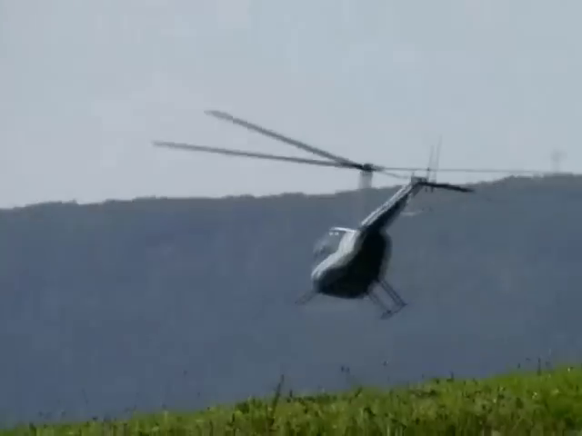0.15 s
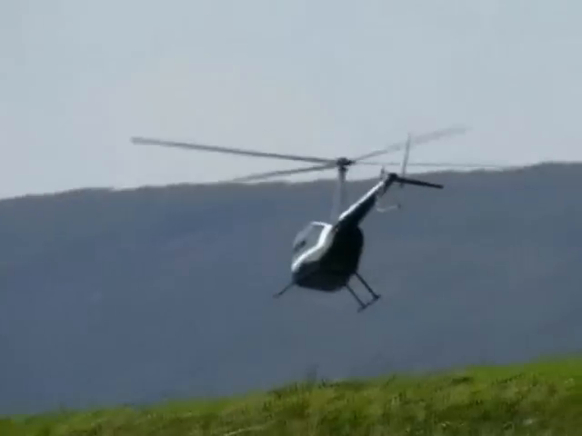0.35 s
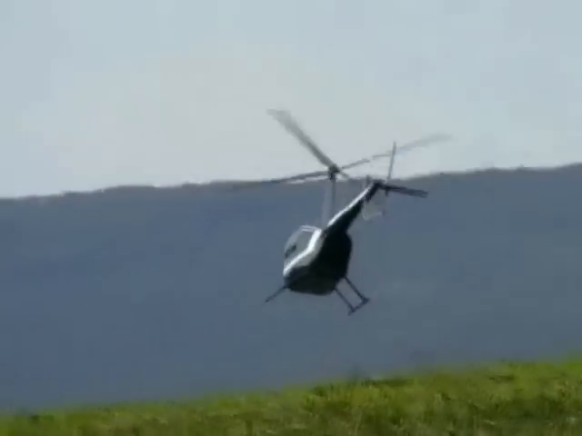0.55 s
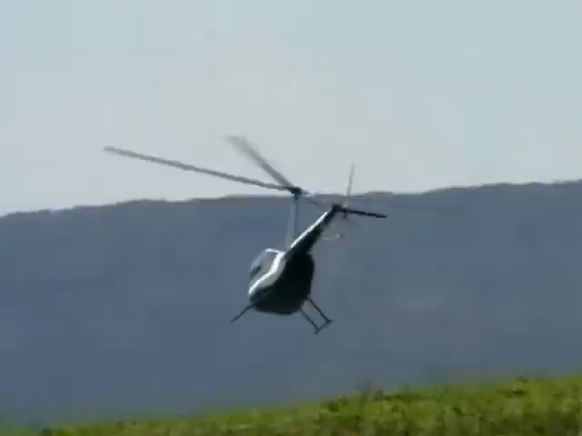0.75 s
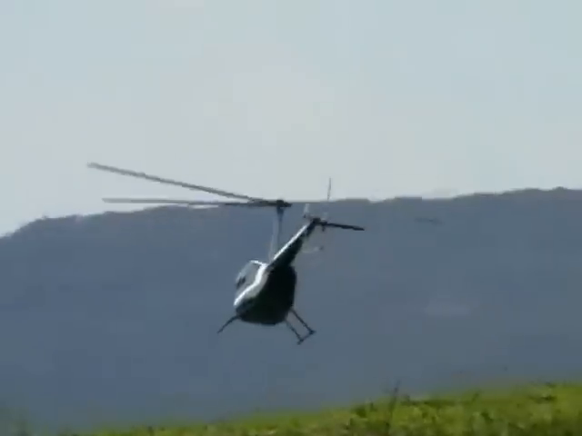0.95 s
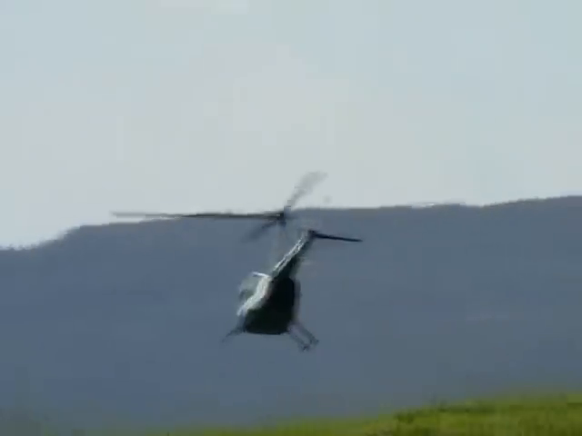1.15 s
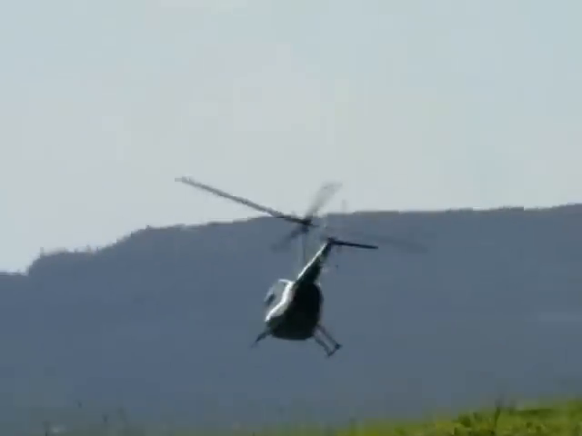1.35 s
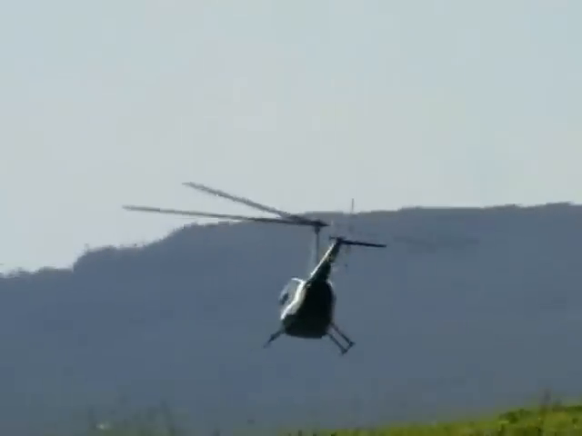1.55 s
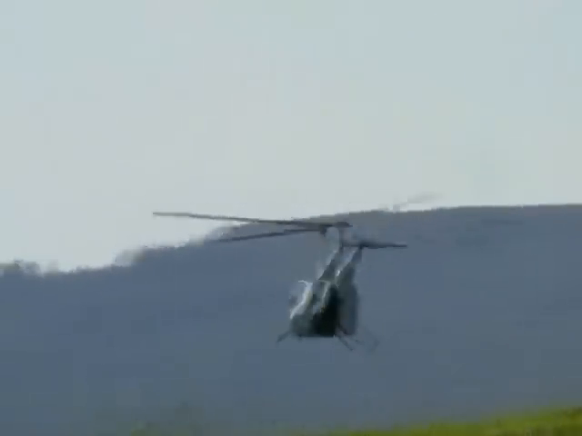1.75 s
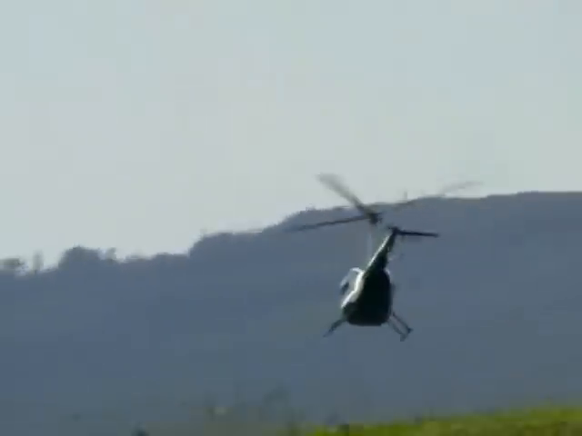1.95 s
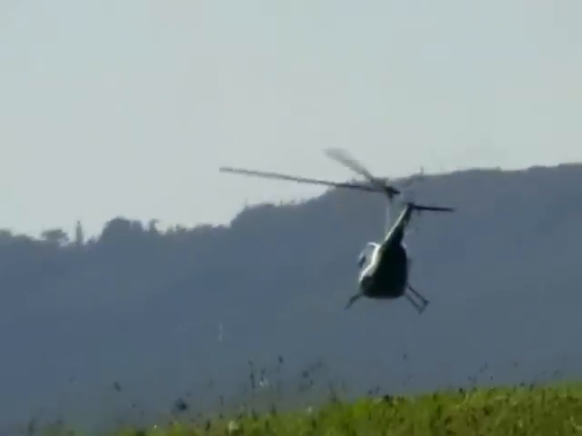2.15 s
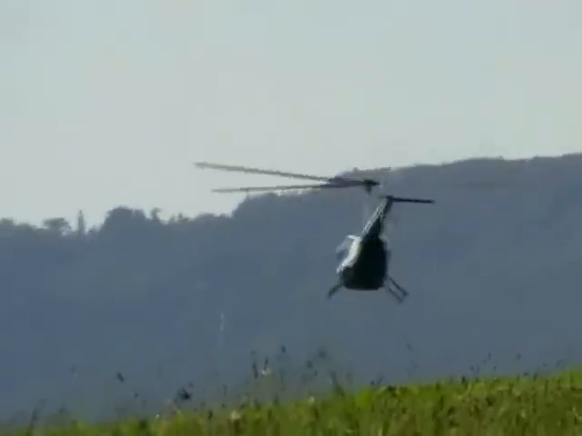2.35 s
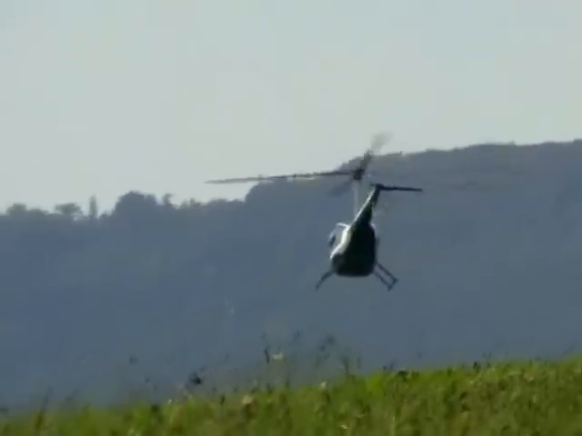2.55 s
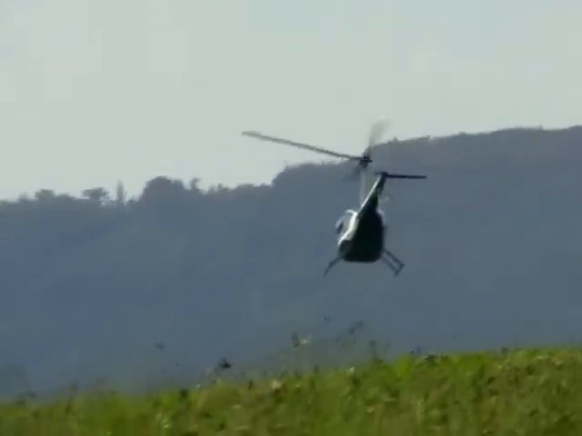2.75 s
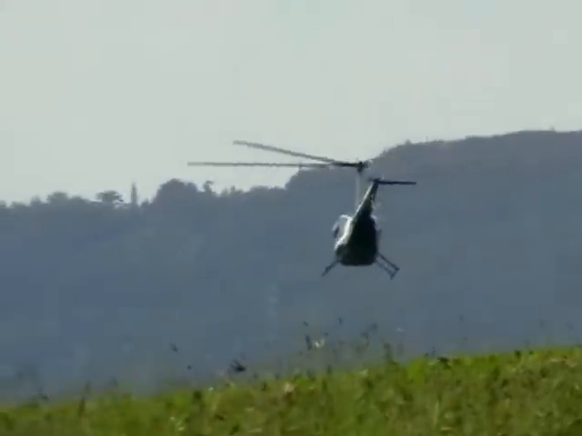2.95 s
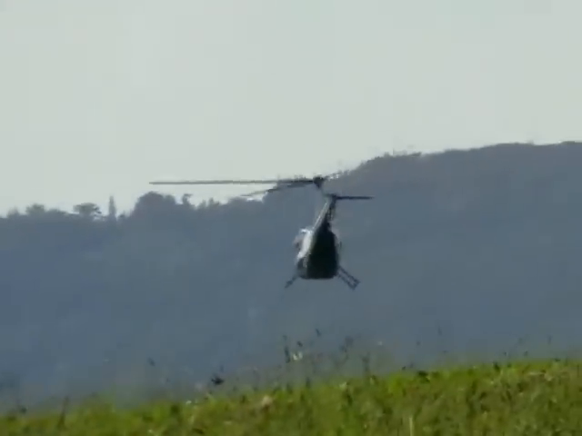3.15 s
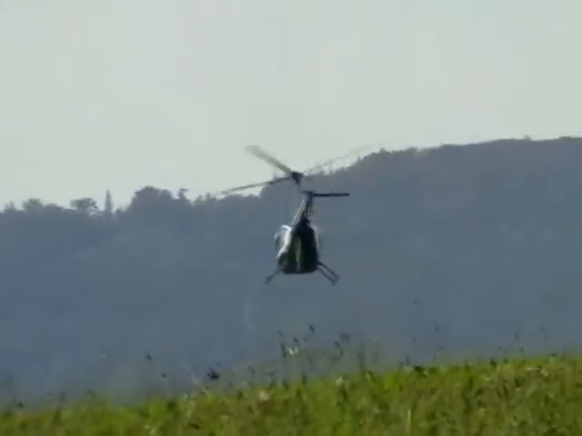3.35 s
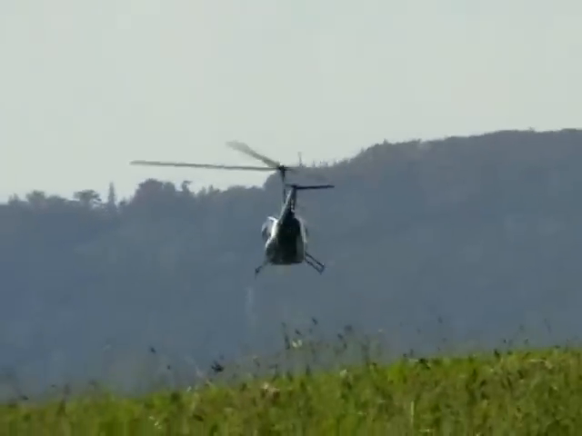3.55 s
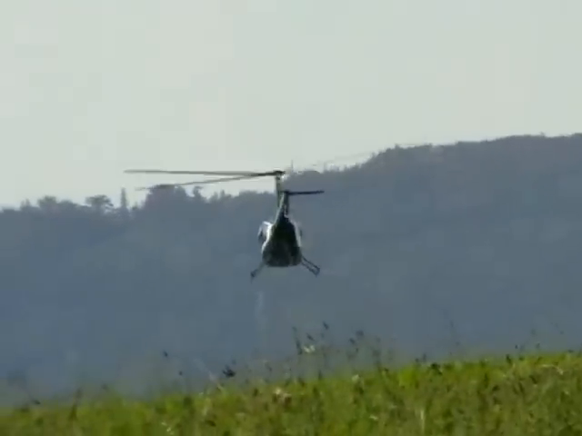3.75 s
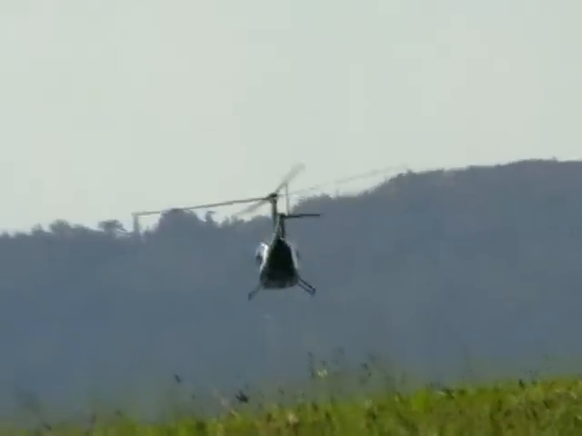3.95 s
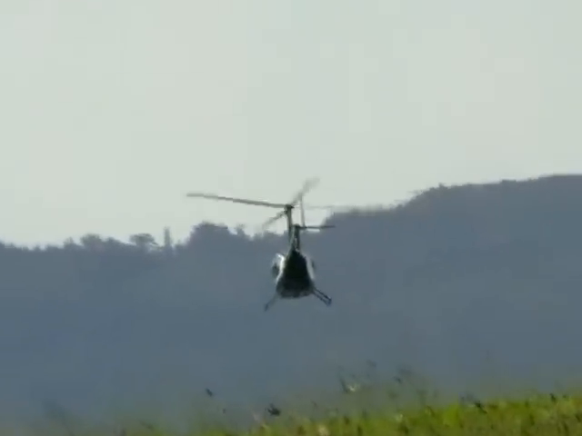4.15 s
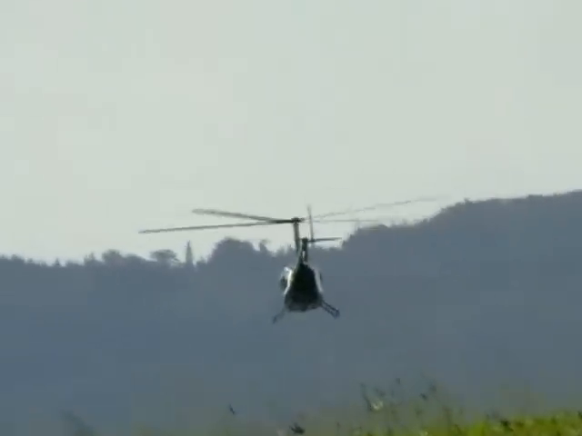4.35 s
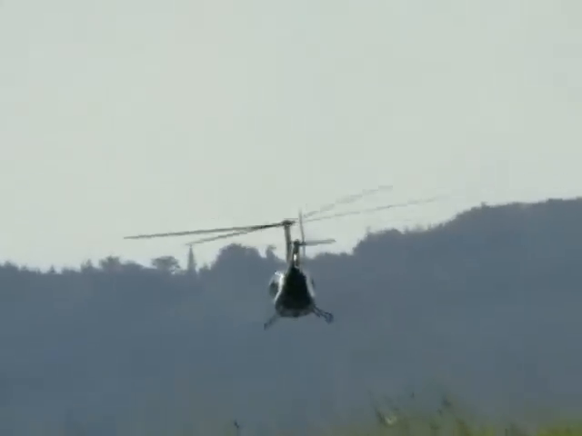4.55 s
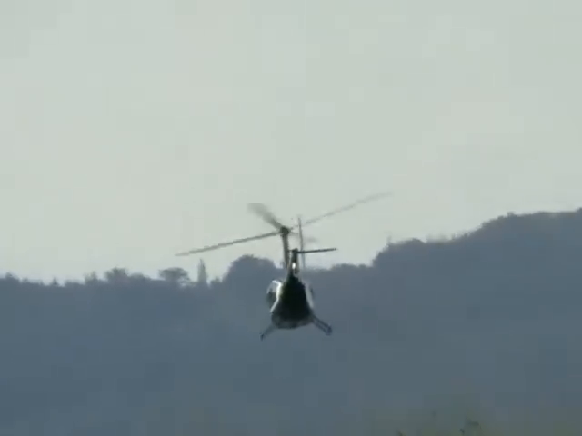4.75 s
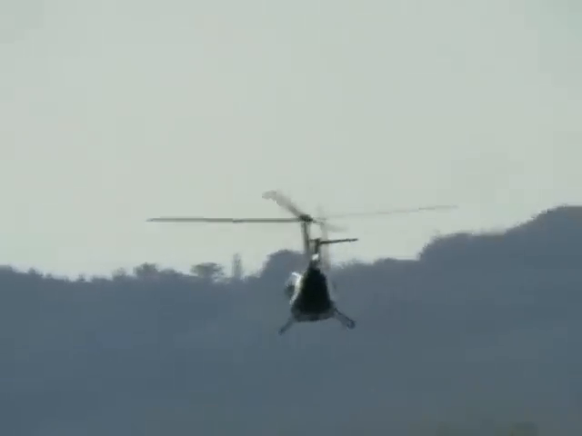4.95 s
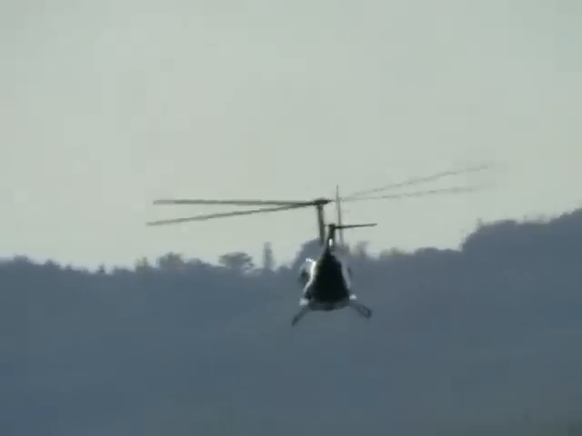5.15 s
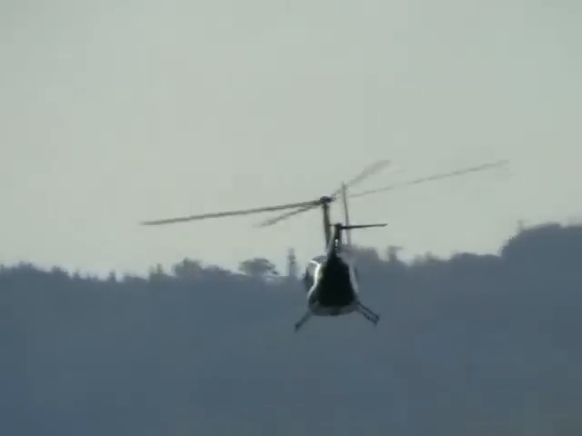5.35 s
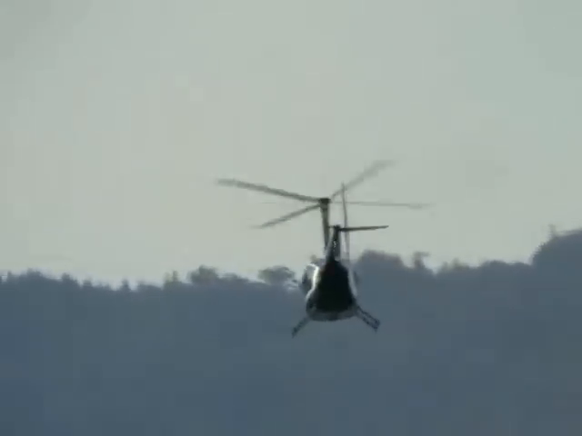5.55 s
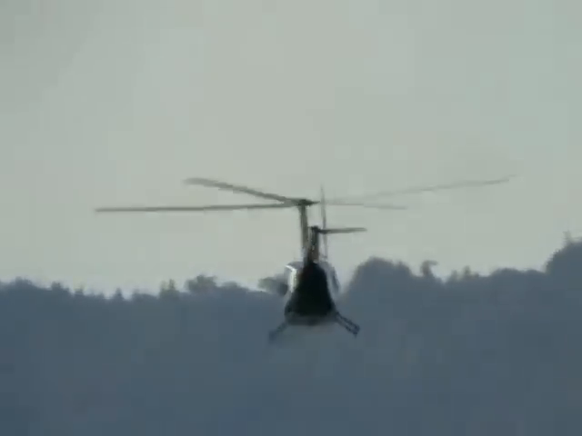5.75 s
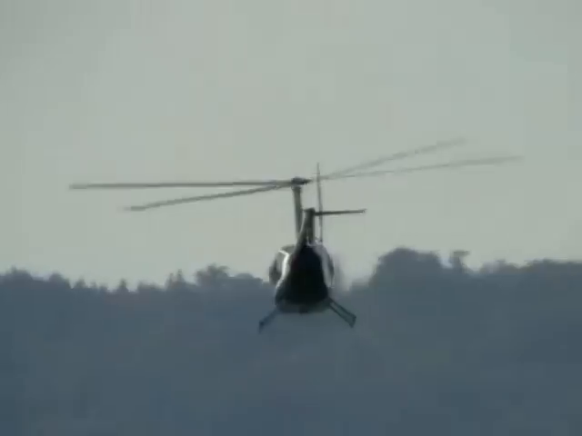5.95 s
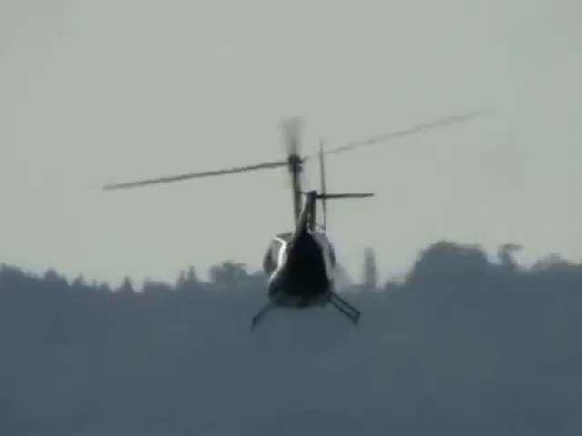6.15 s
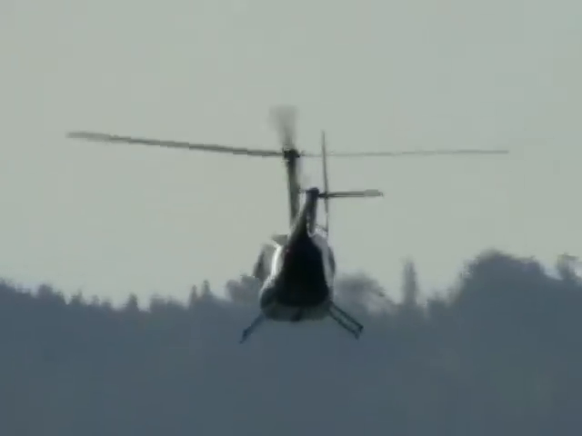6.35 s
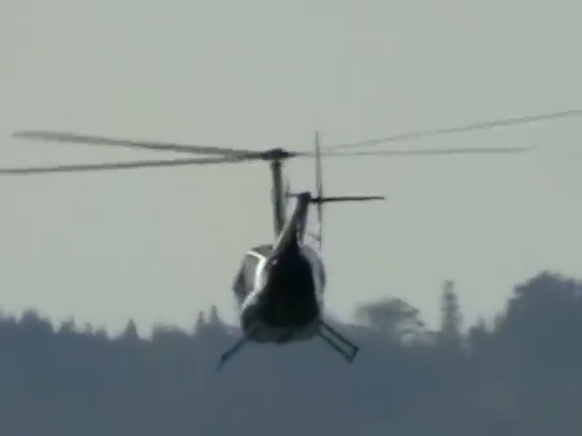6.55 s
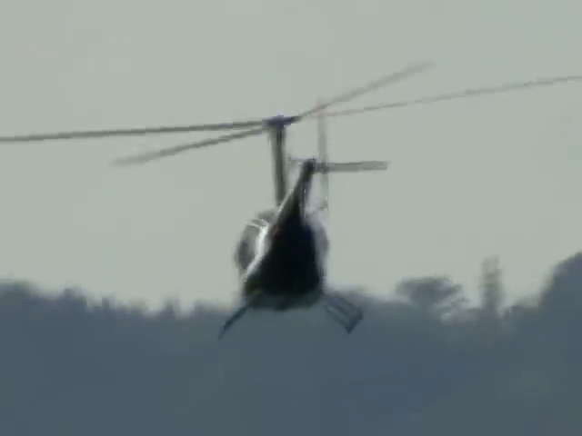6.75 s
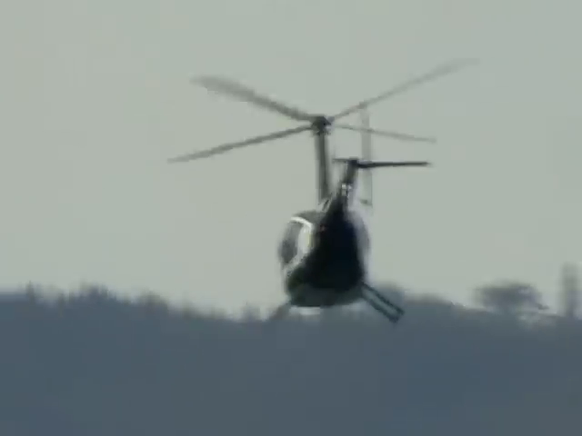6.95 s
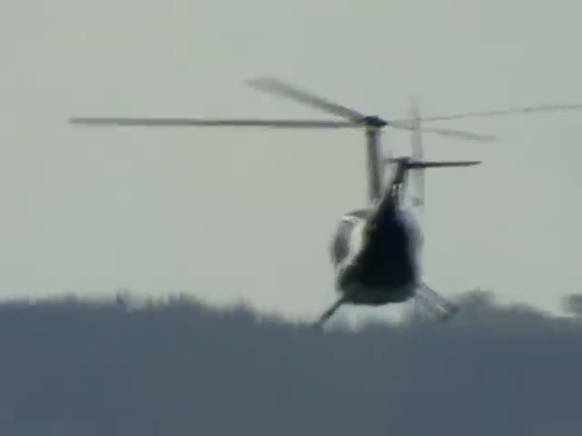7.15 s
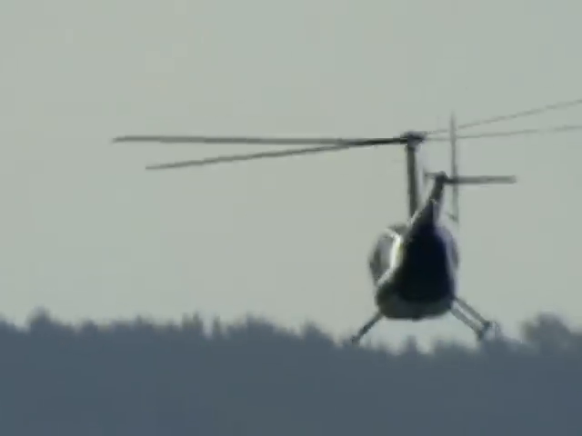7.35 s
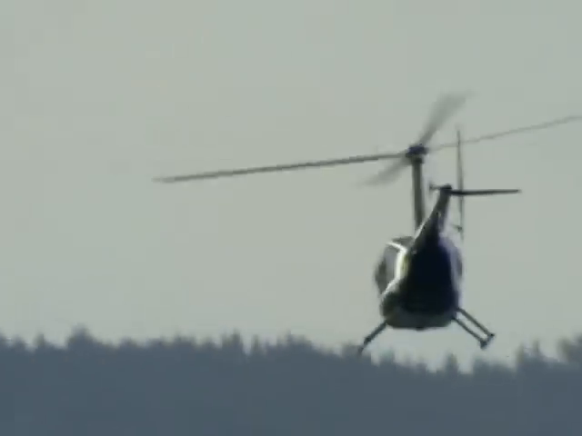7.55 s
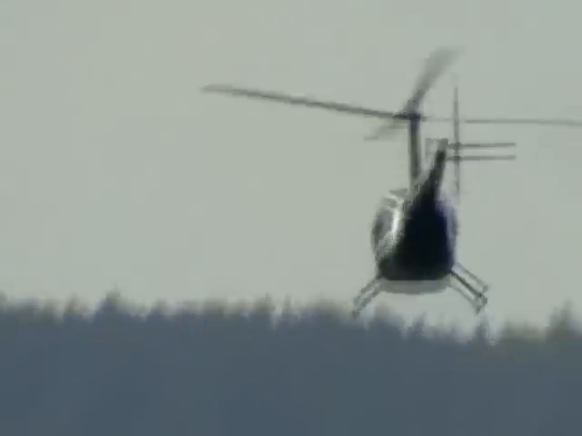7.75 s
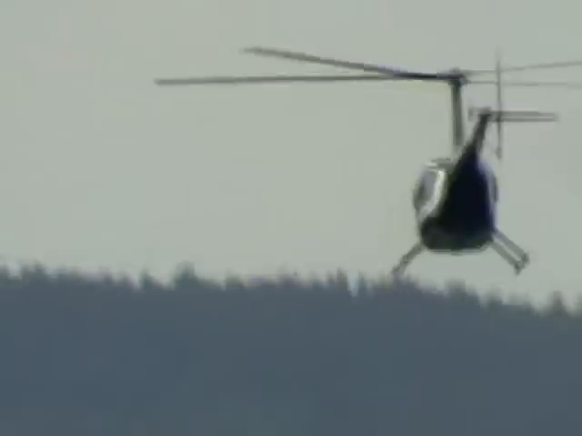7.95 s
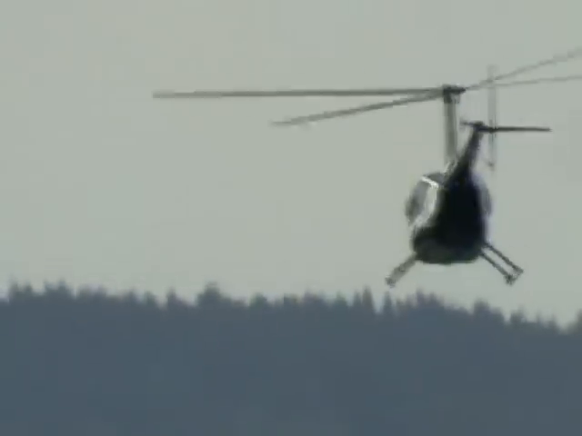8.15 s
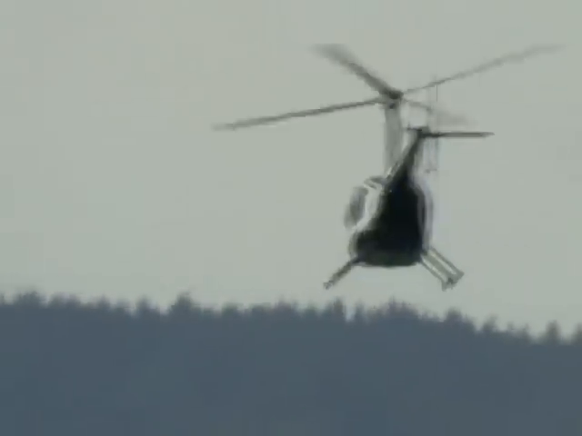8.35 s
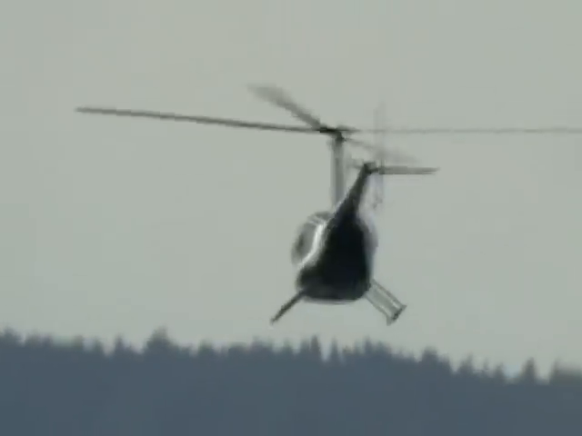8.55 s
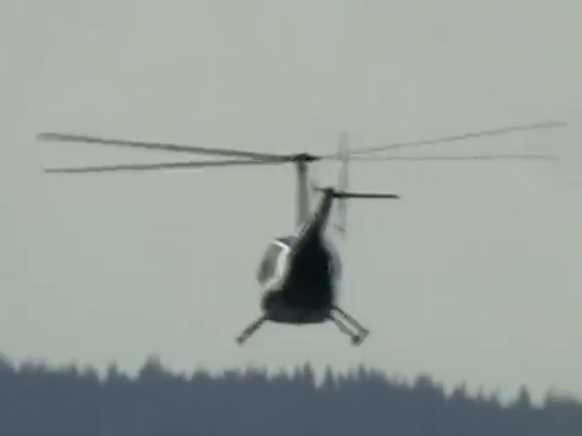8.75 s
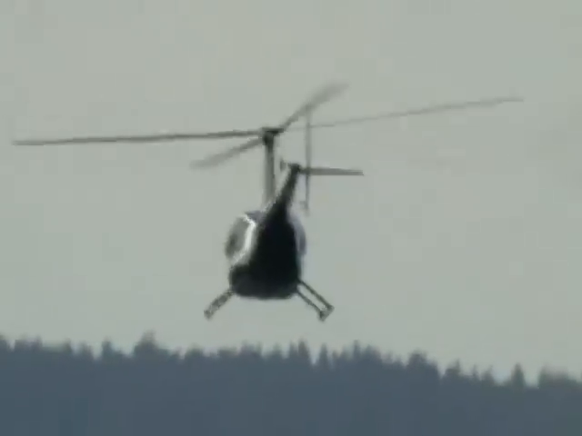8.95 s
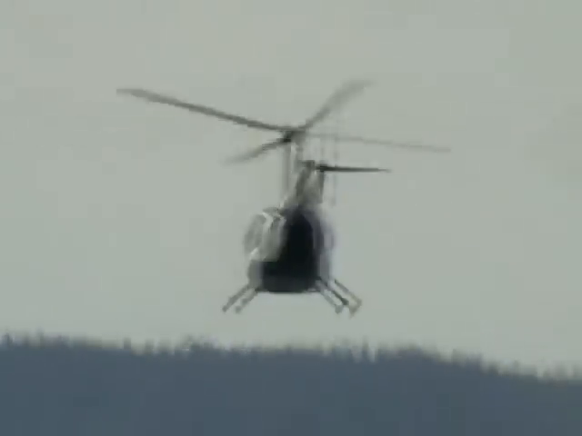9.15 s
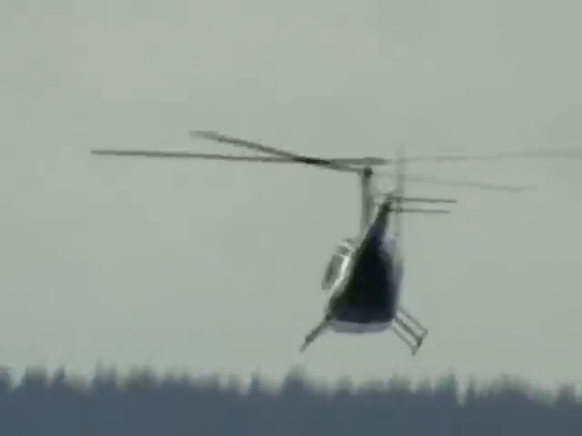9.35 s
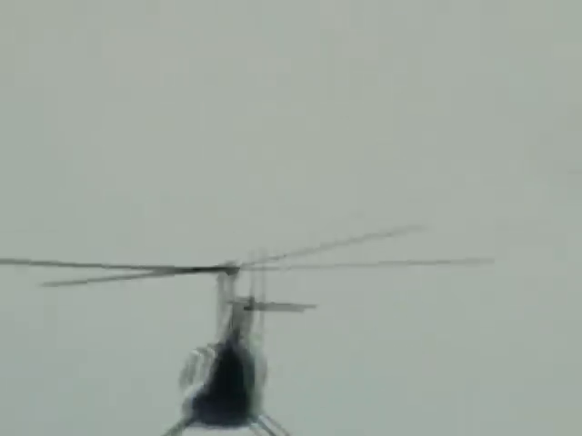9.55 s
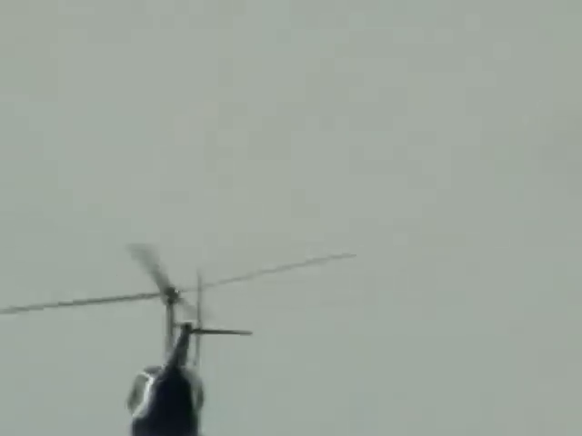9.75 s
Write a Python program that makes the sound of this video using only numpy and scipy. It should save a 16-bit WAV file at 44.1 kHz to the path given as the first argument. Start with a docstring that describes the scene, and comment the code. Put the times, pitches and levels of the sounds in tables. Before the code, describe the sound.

A small piston helicopter is already close and flying away over an open meadow. Its low, steady engine drone carries a barking, raspy exhaust, a humming tail rotor and softly throbbing air. It is loudest in the first 1.5 seconds, with swishing blades and several sharp pops, then gradually recedes, sinking very slightly in pitch but staying audible throughout. More pops and raspy surges come around 2, 4 and 7 to 7.5 seconds. Close by, a grasshopper's high buzz swells from about 1 second and stops abruptly just after 3. Another then scrapes about nine strokes a second in three swelling phrases until the end, near 10 seconds. A very high, thin cricket trill joins at 6.6 seconds, and one dry tick snaps in the grass at 6.8. A small bird gives faint, gliding chirps around 8, 9 and 9.5 seconds. Distant insects shimmer throughout.

```python
"""A summer meadow: a light six-cylinder piston helicopter flies low over it and away toward wooded hills.
Firing pulses and turbulent gas make its exhaust drone, bark, rasp and now and then pop.
The geared tail rotor hums; the main blades swish and leave throbbing, torn air.
Close by, grasshoppers scrape leg on wing and a bush cricket rubs its wings.
There is one dry tick in the grass, and a small bird calls as the engine fades."""
import sys
import numpy as np
from scipy import signal
from scipy.fft import rfft, irfft, next_fast_len
from scipy.io import wavfile

SR = 44100
rng = np.random.default_rng(int(sys.argv[2]) if len(sys.argv) > 2 else 0)


def waveform_to_disk(signal):
    """Save audio, clipped to [-1, 1], as 16-bit WAV at the path in sys.argv[1]."""
    frames = np.transpose(np.atleast_2d(signal))
    scaled = np.clip(frames, -1, 1) * 32767
    samples = np.round(scaled).astype(np.int16)
    wavfile.write(sys.argv[1], SR, samples)


N = 436575
T = np.arange(N) / SR
CYLINDERS = 6
TAIL_BLADES_PER_CYCLE, MAIN_BLADES_PER_CYCLE = 3.562, .588  # blade passes per four-stroke cycle


# Engine speed as heard, sinking as it turns away. Each row: time in seconds, four-stroke rate in Hz.
CYCLE_HZ = [(0, 20.91), (.6, 20.83), (1.5, 20.8), (2.7, 20.72), (3.3, 20.59), (4.5, 20.63), (5.3, 20.63),
            (5.8, 20.58), (7.3, 20.57), (8.3, 20.53), (9.9, 20.52)]

def helicopter(closest_m=32.3, speed_m_per_s=24.2, passed_s=2.16):
    """Engine and rotors turn together, flying straight away; the closest point is passed_s in the past."""
    rate_hz, = in_time(CYCLE_HZ)
    cycle = np.cumsum(rate_hz * (1 + .0006 * drift(4))) / SR
    range_m = np.hypot(closest_m, speed_m_per_s * (T + passed_s))
    near = range_m[0] / range_m
    exhaust = drone(cycle, near) + bark(cycle, near) + rasp(cycle, near) + ringing(cycle) + pops()
    return exhaust + tail_rotor(cycle, near) + swish(cycle, near) + wash(cycle, near)


# Firing tone, swelling and sinking over the ground. Each row: time in seconds, level in dB.
FIRING_DB = [(0.1, -44), (1.23, -49), (1.48, -47.5), (3.1, -49.5), (3.31, -51.5), (3.61, -50),
             (3.88, -53.5), (4.07, -50.5), (6.53, -55), (9.8, -53.5)]
# Other engine tones. Each row: multiple of the cycle rate, starting level in dB, range exponent.
ENGINE_TONES = [(3.04, -81, .8), (7.02, -67, 0.83), (9, -46.5, 0.9), (10, -50.5, 1.06), (11, -57.5, 1.14),
                (11.994, -43, 1.026), (13, -63, 0.92), (14, -59.5, 1.05), (15.06, -60.5, 1),
                (15.96, -68.5, 1.15), (18, -72.5, 0.74), (19.04, -69, 0.8), (20.92, -70, 0.86),
                (24.05, -68.5, 1.34)]

def drone(cycle, near):
    """Six firings a cycle give a low hum, its octave about as strong; unequal cylinders add the rest."""
    firing = envelope(FIRING_DB) * tones(cycle, [(CYLINDERS, 0, 0)], near, waver_db=.4)
    return firing + tones(cycle, ENGINE_TONES, near, waver_db=.87)


def firings(cycle, uneven_db=6, rough_db=5):
    """A pressure pulse per firing; each cylinder has its own strength, and no two burns are alike."""
    count = np.floor(CYLINDERS * cycle).astype(int)
    at = np.flatnonzero(np.diff(count))
    cylinder_db = uneven_db * np.array([.6, -.76, .95, -1.5, .021, -.76])
    pulses = np.zeros(N)
    pulses[at] = from_db(cylinder_db[count[at] % CYLINDERS] + rough_db * rng.standard_normal(len(at)))
    return rms_one(pulses)


# Exhaust bark. Each row: time in seconds, level in dB before trim.
BARK_DB = [(0.1, -42), (0.29, -42.5), (0.78, -42), (2.85, -54.5), (4.12, -52), (4.93, -53.5), (5.42, -57.5),
           (7.63, -56.5), (8.34, -58), (9.66, -58.5), (9.8, -58)]
# Low pipe resonances. Each row: centre in Hz, width in Hz, relative dB from the side and from behind.
BARK_RESONANCES = [(563, 105, -9, -9.5), (690, 67, -1, 1), (824, 71, 0.5, -0.5), (980, 124, -5.5, -3.5),
                   (1090, 77, -7.5, 0), (1387, 159, -2.5, 0.5)]
# Tones lifted by the pipe. Each row: multiple of the cycle rate, starting dB re the bark, range exponent.
PIPE_TONES = [(28, -26.5, .6), (30, -24, .6), (32, -20, .4), (33, -14, .6), (36, -17, .6), (39, -5.5, 1.1),
              (42, -18.5, .6), (47, -22, .6), (51, -23, .2), (68, -18, .6), (72, -18, .6)]

def bark(cycle, near):
    """Pulses and puffs of turbulent gas ring the pipe, which also lifts out a whine of harmonics."""
    gas = rng.standard_normal(N) * bursts(CYLINDERS * cycle, sharpness=.31 * near)
    ring = pipe(gas + .31 * firings(cycle), BARK_RESONANCES, near)
    whine = tones(cycle, PIPE_TONES, near, waver_db=2.5)
    return envelope(BARK_DB, trim_db=-.06) * (ring + whine)


# The rasp surges as the pipe swings toward the listener; the air soon takes the higher sizzle.
# Each row: time in seconds, level in dB before trim.
RASP_DB = [(0.0, -46), (0.38, -46), (0.72, -46.5), (1.05, -43.5), (1.27, -49), (2.12, -50.5), (2.87, -59),
           (3.42, -54.5), (4.24, -53.5), (4.55, -58.5), (4.96, -55), (6.01, -57), (7.47, -51), (8.55, -62),
           (9.21, -63.5), (9.9, -61)]
SIZZLE_DB = [(0.0, -48.5), (0.63, -56), (0.99, -45), (1.52, -54.5), (2.15, -52.5), (2.42, -58), (2.81, -62),
             (3.91, -59.5), (5.68, -63), (7.31, -61.5), (9.9, -70)]
# Upper pipe resonances. Each row: centre in Hz, width in Hz, relative dB from the side and from behind.
RASP_RESONANCES = [(1415, 117, 1, -11), (1633, 80, -10, -1.5), (1755, 156, -4, -3.5), (2016, 213, -1.5, -2),
                   (2144, 111, 3, 4), (2322, 164, -4.5, -9.5)]
SIZZLE_RESONANCES = [(2560, 200, -1, 1), (2910, 260, 4.5, 0.5), (3550, 400, -0.5, -3), (4160, 106, 1, -6.5),
                     (4700, 270, -7.5, -29)]

def rasp(cycle, near, surge_db=.82):
    """Gas puffs ring the pipe's treble; distance blurs them, and moving air makes them surge."""
    harder_bank = bursts(CYLINDERS / 2 * cycle, sharpness=5)  # one bank of cylinders spits harder
    each_firing = bursts(CYLINDERS * cycle, sharpness=2)
    puffs = rms_one(1 + .7 * near * harder_bank + .25 * near * each_firing)
    flicker = from_db(1.4 * drift(27))
    grit = pipe(rng.standard_normal(N) * puffs * flicker, RASP_RESONANCES, near)
    sizzle = ground_bounce(pipe(rng.standard_normal(N) * puffs, SIZZLE_RESONANCES, near))
    treble = envelope(RASP_DB, trim_db=.5) * grit + envelope(SIZZLE_DB, trim_db=-1) * sizzle
    return from_db(surge_db * drift(6.2)) * treble


def pipe(x, modes, near, near_behind=.3, near_side=.86):
    """The exhaust's colour changes as the tail turns toward the listener."""
    side = body(x, [(hz, width, db) for hz, width, db, _ in modes])
    behind = body(x, [(hz, width, db) for hz, width, _, db in modes])
    side_share = np.clip((near - near_behind) / (near_side - near_behind), 0, 1)
    return side_share * side + (1 - side_share) * behind


# Surges of the pipe's strongest resonance. Each row: centre in seconds, level in dB.
RING_SURGES = [(.42, -51), (.92, -45.5), (1.82, -49), (3.35, -58.5), (4.04, -54), (7.05, -58), (7.28, -57),
               (7.64, -54)]

def ringing(cycle, centre_hz=2110, width_hz=150):
    """The harder bank of cylinders sets one narrow resonance chattering in short surges."""
    puffs = rng.standard_normal(N) * bursts(CYLINDERS / 2 * cycle, sharpness=2)
    return swells(RING_SURGES, width_s=.049) * body(puffs, [(centre_hz, width_hz, 0)])


# Exhaust pops. Each row: start in seconds, peak in dB, pitch in Hz.
EXHAUST_POPS = [(0.0338, -29.5, 1960), (0.399, -31, 1800), (0.4469, -31.5, 2020), (0.8964, -28, 2260),
                (0.9114, -27, 2300), (1.039, -33, 2100), (1.0884, -38, 1970), (1.1363, -32, 2170),
                (2.0023, -36.5, 2164), (3.9399, -38, 2010), (4.0362, -37, 2080), (4.0844, -43, 2120),
                (6.8194, -37.5, 2000), (7.0454, -39, 2100), (7.3372, -38, 1950), (7.6244, -39, 2120)]

def pops(rise_s=.0016):
    """Sharp cracks from the exhaust: a few cycles near the pipe's strongest resonance."""
    out = np.zeros(N)
    for start_s, db, hz in EXHAUST_POPS:
        at = int(start_s * SR)
        age_s = T[:min(SR // 20, N - at)]
        shape = age_s / rise_s * np.exp(1 - age_s / rise_s)
        out[at:at + len(age_s)] += from_db(db) * shape * np.sin(2 * np.pi * hz * age_s)
    return out


# Tail rotor tones. Each row: multiple of the blade rate, starting level in dB, range exponent.
TAIL_TONES = [(1, -75, 0.83), (2, -57, 1.1), (3, -54, 3.4), (4, -72, 1), (5, -82, .9)]

def tail_rotor(cycle, near):
    """Geared to the engine, the tail rotor hums at harmonics of its blade rate."""
    return tones(cycle * TAIL_BLADES_PER_CYCLE, TAIL_TONES, near, waver_db=4)


# Hiss of the advancing blade tip. Each row: centre in Hz, width in Hz, relative level in dB.
TIP_BANDS = [(2850, 560, 9.5), (3540, 250, 4.5), (4020, 380, 9.5)]
# A blade cuts torn air and hisses harder. Each row: centre in seconds, level in dB.
BLADE_CUTS = [(.815, -42.5), (.97, -47), (1.105, -41.5), (1.155, -49), (1.30, -45.5), (1.445, -48)]

def swish(cycle, near, level_db=-50, loudest_s=.65, width_s=.4):
    """Each blade tip hisses as it swings toward the listener, while the rotor's edge faces this way."""
    passing = bursts(cycle * MAIN_BLADES_PER_CYCLE + .35, sharpness=3.2)
    facing = np.exp(-.5 * ((T - loudest_s) / width_s) ** 2)
    gain = np.hypot(from_db(level_db) * near * facing * passing, swells(BLADE_CUTS, width_s=.0056))
    return gain * ground_bounce(body(rng.standard_normal(N), TIP_BANDS))


# Rotor wash. Each row: frequency in Hz, relative density in dB.
WASH_SPECTRUM = [(20, -31), (42, -25), (56, -2.5), (95, -1), (160, 2), (260, 3), (330, -3.5), (420, -1.5),
                 (490, -8), (620, -3.5), (1200, -12), (2500, -13), (5000, -38)]
# A soft puff in the wash. Each row: centre in seconds, level in dB.
WASH_PUFF = [(4.18, -47)]

def wash(cycle, near, start_db=-53, range_exponent=.58):
    """Torn air behind the main blades, throbbing at each blade's passing."""
    gain = np.hypot(from_db(start_db) * near ** range_exponent, swells(WASH_PUFF, width_s=.011))
    return gain * noise(WASH_SPECTRUM) * bursts(cycle * MAIN_BLADES_PER_CYCLE, sharpness=.053)


# A near grasshopper's swelling buzz. Each row: time in seconds, syllable rate in Hz, level in dB.
BUZZ_CURVE = [(0, 50, -87), (.7, 49.6, -65), (1.2, 49.75, -56.5), (2, 49.45, -52), (2.5, 49.07, -51),
              (3.09, 47.5, -50), (3.13, 46.4, -52), (3.15, 47.5, -110)]
# Its wing resonances. Each row: centre in Hz, width in Hz, relative level in dB.
WING_RESONANCES = [(8400, 320, 4), (9200, 260, -10), (10480, 600, -9), (12450, 560, -16.5),
                   (14700, 1200, -32), (4450, 550, -10.5)]

def buzzing_grasshopper():
    """A leg scraped once per syllable sets the wing's resonances ringing."""
    rate_hz, level_db = in_time(BUZZ_CURVE)
    scrape = rng.standard_normal(N) * bursts(np.cumsum(rate_hz) / SR, sharpness=2.1)
    return from_db(level_db + .27 * drift(14)) * body(scrape, WING_RESONANCES)


# Slow grasshopper. Each row: start in seconds, length in seconds, stroke rate in Hz, mid-phrase dB.
STROKE_PHRASES = [(3.241, 2.65, 9.25, -54.5), (5.98, 1.5, 8.78, -60), (7.584, 2.4, 8.95, -53.5)]
# One leg stroke. Each row: frequency in Hz, relative density in dB.
STROKE_SPECTRUM = [(3500, -8), (5000, 2.5), (6000, 8), (7200, 10), (8300, 5), (9600, 6.5), (11000, 0.5),
                   (16000, -39)]

def slow_grasshopper(swell_db=6, uneven_db=1):
    """Evenly paced strokes of a toothed leg, swelling and dying away in each phrase."""
    strokes = []
    for start_s, length_s, rate_hz, db in STROKE_PHRASES:
        age_s = np.arange(0, length_s, 1 / rate_hz)
        arch_db = db - swell_db * (2 * age_s / length_s - 1) ** 2
        strokes += zip(start_s + age_s, arch_db + uneven_db * rng.standard_normal(len(age_s)))
    teeth = rms_one(from_db(3 * np.tanh(drift(120))))
    return swells(strokes, width_s=.015) * noise(STROKE_SPECTRUM) * teeth


# Bush cricket's song. Each row: time in seconds, wing stroke rate in Hz, pip level in dB.
CRICKET_CURVE = [(6.6, 97.6, -110), (6.64, 97.6, -65.5), (6.85, 97.5, -62), (7.35, 96.4, -63.5),
                 (7.8, 93.5, -64.5), (8.95, 89.5, -62.5), (9.9, 91, -63)]

def cricket(wing_hz=13750, scatter=.38):
    """Each wing stroke is a brief pip with a scratch at its heart; grass scatters some into a sizzle."""
    rate_hz, level_db = in_time(CRICKET_CURVE)
    strokes = np.cumsum(rate_hz) / SR
    pitch_hz = wing_hz + 330 * drift(400)
    tone = np.sqrt(2) * np.sin(2 * np.pi * np.cumsum(pitch_hz) / SR)
    pips = bursts(strokes, sharpness=16) * tone
    rub = rms_one(resonate(rng.standard_normal(N), hz=14300, width_hz=3500))
    scratches = .65 * bursts(strokes, sharpness=24) * rub
    return from_db(level_db) * (pips + scratches + scatter * rub)


# Bird notes. Each row: start in seconds, length in seconds, first and last pitch in Hz, level in dB.
BIRD_NOTES = [(8.10, .05, 3100, 5600, -63), (8.19, .04, 3400, 5400, -61), (8.98, .17, 6300, 3300, -58),
              (9.01, .1, 5800, 3900, -60), (9.5, .2, 5400, 3000, -61.5)]

def bird(warble_depth=.052, warble_hz=65, echo_db=-4, echo_s=.021):
    """Thin, hoarse, warbling glides with a faint echo."""
    out = np.zeros(N)
    unsteady = 1 + .05 * drift(190)
    for start_s, length_s, first_hz, last_hz, db in BIRD_NOTES:
        along = np.linspace(0, 1, int(length_s * SR))
        warble = 1 + warble_depth * np.sin(2 * np.pi * warble_hz * length_s * along)
        hz = first_hz * (last_hz / first_hz) ** along * warble * unsteady[:len(along)]
        arch = np.abs(np.sin(np.pi * along)) ** .5
        note = from_db(db) * arch * np.sin(2 * np.pi * np.cumsum(hz) / SR)
        at = int(start_s * SR)
        out[at:at + len(note)] += note[:N - at]
    out *= rms_one(from_db(4 * drift(70)))  # hoarseness
    return out + from_db(echo_db) * np.interp(T - echo_s, T, out)


def tick(start_s=6.771, decay_s=.003, gain_db=-36):
    """A short dry snap in the grass."""
    snap = (T > start_s) * np.exp(-np.abs(T - start_s) / decay_s) * rng.standard_normal(N)
    band = signal.butter(4, [1500, 6300], "band", fs=SR, output="sos")
    return from_db(gain_db) * signal.sosfilt(band, snap + 1e-18)


# Meadow chorus. Each row: time in seconds, level in dB before trim.
CHORUS_DB = [(0.0, -56), (3.08, -58), (3.31, -57.5), (3.91, -55.5), (6.01, -58.5), (6.31, -57), (6.86, -59),
             (8.55, -54.5), (9.9, -57)]
# Its colour. Each row: frequency in Hz, relative density in dB.
CHORUS_SPECTRUM = [(3000, -23), (4600, -5.5), (5300, 0), (6000, 4), (7100, 5.5), (8300, 2), (9500, -2),
                   (11000, -7.5), (16000, -8.5)]

def chorus(flicker_db=1):
    """Many far grasshoppers blend to a shimmer."""
    return envelope(CHORUS_DB, trim_db=3) * from_db(flicker_db * drift(52)) * noise(CHORUS_SPECTRUM)


# Open-air hiss. Each row: time in seconds, level in dB.
AIR_DB = [(0, -61.5), (3, -61.5), (5, -65), (7, -63), (9.9, -62)]
# Its colour. Each row: frequency in Hz, relative density in dB.
AIR_SPECTRUM = [(30, 7), (500, 6), (2500, 6.5), (4400, 4), (7000, -13), (10000, -1), (13000, 1),
                (16000, -1.5)]

def air():
    """Faint hiss of the open air."""
    return envelope(AIR_DB) * noise(AIR_SPECTRUM)


def ground_bounce(x, share=.29, delay_s=.00142):
    """The bounce off the meadow arrives just late enough to cut notches into the treble."""
    return (x + share * np.interp(T - delay_s, T, x)) / np.hypot(1, share)


def tones(turns, orders, near, waver_db, lag_turns=.068):
    """Tones of a rotation, wavering in moving air; higher ones lag, smearing the thud of each turn."""
    out = np.zeros(N)
    for order, db, range_exponent in orders:
        gain = near ** range_exponent * from_db(db + waver_db * drift(2.2))
        out -= np.sqrt(2) * gain * np.cos(2 * np.pi * order * (turns - lag_turns * order))
    return out


def resonate(x, hz, width_hz):
    """One resonance, peak gain 1."""
    r = np.exp(-np.pi * width_hz / SR)
    poles = [1, -2 * r * np.cos(2 * np.pi * hz / SR), r * r]
    return signal.lfilter(np.array([1, 0, -1]) * (1 - r * r) / 2, poles, x + 1e-18)


def body(x, modes):
    """Steep-sided resonances in parallel, alternating in sign, rms 1."""
    out = np.zeros(N)
    for k, (hz, width_hz, db) in enumerate(modes):
        once = resonate(x, hz, 2 * width_hz)
        out += (-1) ** k * from_db(db) * resonate(once, hz, 2 * width_hz)
    return rms_one(out)


def bursts(turns, sharpness):
    """One smooth burst per turn, rms 1."""
    return rms_one(np.exp(sharpness * (np.cos(2 * np.pi * turns) - 1)))


def swells(rows, width_s):
    """A bell-shaped swell per row."""
    out = np.zeros(N)
    for centre_s, db in rows:
        span = slice(max(int((centre_s - 4 * width_s) * SR), 0), int((centre_s + 4 * width_s) * SR))
        out[span] += from_db(db) * np.exp(-.5 * ((T[span] - centre_s) / width_s) ** 2)
    return out


def noise(spectrum):
    """Noise with a given spectrum, rolled off below its first row, rms 1."""
    size = next_fast_len(N)
    hz, db = np.transpose(spectrum)
    bin_hz = np.maximum(np.arange(size // 2 + 1) * SR / size, 1)
    gain = from_db(np.interp(np.log(bin_hz), np.log(hz), db)) * np.minimum(bin_hz / hz[0], 1) ** 2
    return rms_one(irfft(rfft(rng.standard_normal(size)) * gain, size)[:N])


def drift(rate_hz, hop=100):
    """Smooth random wander, rms about 1."""
    r = np.exp(-2 * np.pi * rate_hz * hop / SR)
    slow = signal.lfilter([1], [1, -2 * r, r * r], rng.standard_normal(N // hop + 1002))[1000:]
    return np.interp(np.arange(N) / hop, np.arange(len(slow)), rms_one(slow))


def in_time(rows):
    """Each column of a curve, per sample."""
    times_s, *columns = np.transpose(rows)
    return [np.interp(T, times_s, column) for column in columns]


def envelope(rows, trim_db=0):
    """A dB curve as gain per sample."""
    return from_db(in_time(rows)[0] + trim_db)


def from_db(db):
    """Decibels to gain."""
    return 10 ** (np.asarray(db) / 20)


def rms_one(x):
    """Scale to unit power."""
    return x / np.sqrt(np.mean(x ** 2) + 1e-20)


def scene():
    """Helicopter and meadow from one point, alike in both channels."""
    mix = helicopter() + buzzing_grasshopper() + slow_grasshopper() + cricket()
    mix += bird() + tick() + chorus() + air()
    return np.tile(mix, (2, 1))


def record(dry, cutoff_hz=15850):
    """Steep low-pass."""
    return signal.sosfilt(signal.ellip(12, .1, 90, cutoff_hz, fs=SR, output="sos"), dry)


dry = scene()
out = record(dry)
waveform_to_disk(out)
```